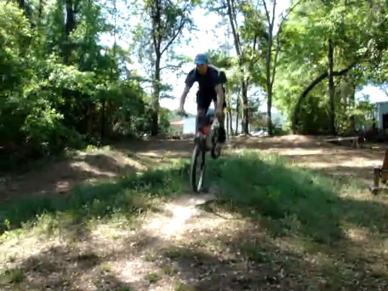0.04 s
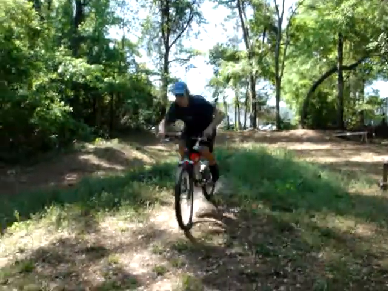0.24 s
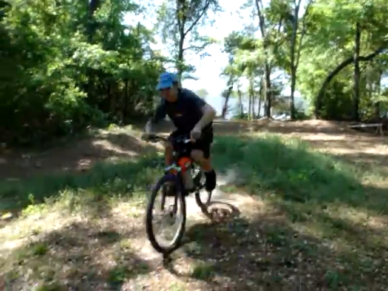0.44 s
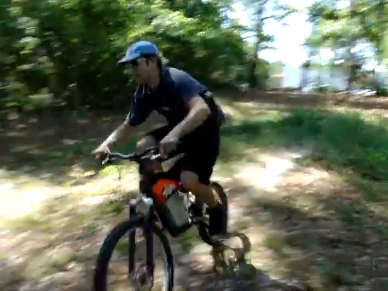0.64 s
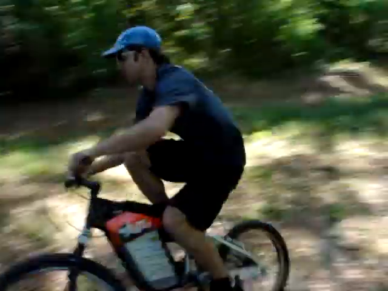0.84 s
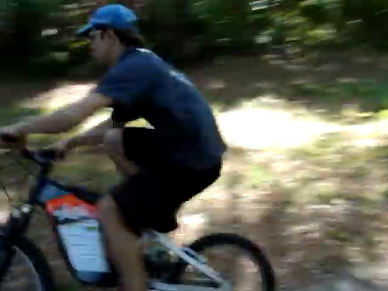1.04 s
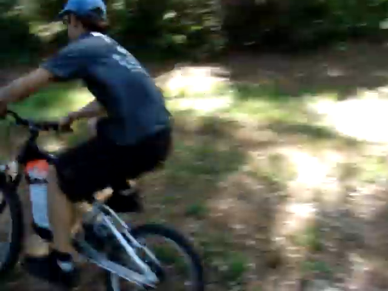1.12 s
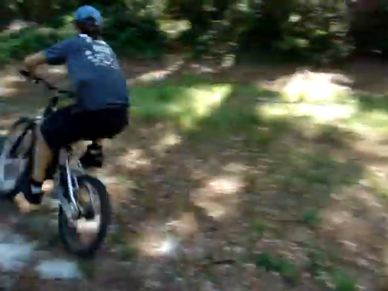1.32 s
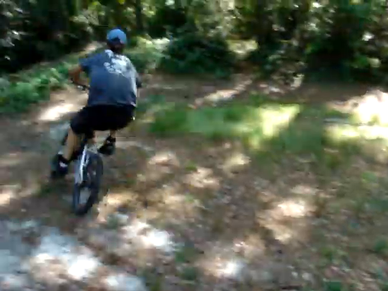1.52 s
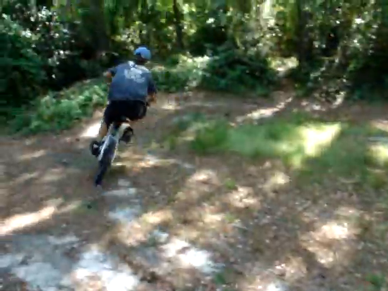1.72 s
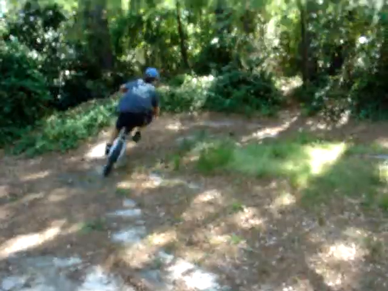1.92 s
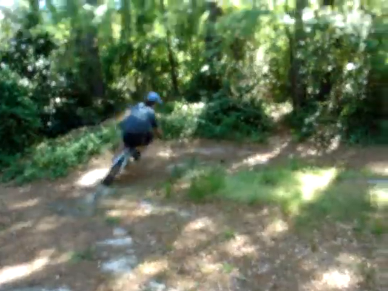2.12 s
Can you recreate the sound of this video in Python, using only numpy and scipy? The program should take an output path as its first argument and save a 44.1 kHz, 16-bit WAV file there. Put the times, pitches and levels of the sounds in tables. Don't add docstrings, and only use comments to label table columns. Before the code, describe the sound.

Bike crashes down with a distorted thud, clattering and crackling over dry leaves as it rides off.

```python
import sys
import numpy as np
from scipy import signal
from scipy.fft import rfft, irfft
from scipy.io import wavfile
from scipy.ndimage import uniform_filter1d, minimum_filter1d

SR = 44100
rng = np.random.default_rng(int(sys.argv[2]) if len(sys.argv) > 2 else 0)


def invert_db(x):
    u = np.asarray(x, float) / 20
    return 10 ** u


def generate_wav(sig):
    pcm = np.round(np.clip(np.atleast_2d(sig).T, -1, 1) * 32767).astype(np.int16)
    wavfile.write(sys.argv[1], SR, pcm)


N = 94815

# start_s, peak_db, pitch_hz, chatter_s
KNOCKS = [(0.233, -11.5, 327, 0.018), (0.281, -14.5, 475, 0.043), (0.407, -13.5, 534, 0.017),
          (0.418, -23, 332, 0.024), (0.464, -18, 347, 0.014), (0.455, -20, 480, 0.022),
          (0.496, -12.5, 477, 0.012), (0.636, -22, 485, 0.027), (0.686, -10, 546, 0.025),
          (0.719, -16.5, 594, 0.017), (0.785, -6, 456, 0.016), (0.816, -15, 472, 0.015),
          (0.869, -25, 560, 0.0087), (0.881, -11, 477, 0.013), (0.924, -15.5, 499, 0.015),
          (0.963, -20.5, 293, 0.022), (1.033, -17.5, 440, 0.0075), (1.085, -14, 400, 0.014),
          (1.121, -12.5, 477, 0.0066), (1.164, -14, 500, 0.0048), (1.175, -18, 329, 0.031),
          (1.202, -3.5, 405, 0.013), (1.247, -18.5, 506, 0.011), (1.265, -11, 523, 0.0066),
          (1.273, -10.5, 460, 0.0028), (1.308, -9.5, 518, 0.009), (1.34, -18, 488, 0.017),
          (1.434, -19.5, 541, 0.0093), (1.499, -25, 392, 0.014), (1.642, -25, 330, 0.011),
          (1.872, -20.5, 300, 0.023), (1.933, -28, 244, 0.0083), (2.119, -24, 308, 0.012)]
# pitch_hz, width_hz, level_db
CASE_MODES = [(1100, 158, -15), (793, 255, -9), (2510, 390, -22.5)]
# start_s, peak_db, length_s, treble_db
CRUNCHES = [(0.22, -7.5, 0.017, -15), (0.283, -9, 0.0039, -3), (0.6214, -12.5, 0.0075, 1.5),
            (0.6877, -9.5, 0.0062, -11), (0.698, -6, 0.0055, -30), (0.7926, -8.5, 0.0057, -33),
            (0.8145, -11.5, 0.026, -11), (0.858, -11, 0.013, -16), (0.89, -13, 0.01, -10),
            (1.003, -18.5, 0.0079, -9), (1.023, -16, 0.02, 0), (1.091, -12.5, 0.016, -4),
            (1.1213, -9.5, 0.0051, -7), (1.16, -10, 0.0028, -22), (1.168, -15, 0.01, -11),
            (1.201, -13, 0.015, -15), (1.245, -14, 0.0092, -8), (1.264, -10, 0.013, -14.5),
            (1.331, -14.5, 0.0088, -21), (1.441, -21, 0.0061, 6.5), (1.4997, -13.5, 0.0046, -12),
            (1.595, -19.5, 0.0033, -4), (1.6165, -29, 0.0039, 11), (1.639, -19.5, 0.004, -2),
            (1.7014, -17.5, 0.0028, -5), (1.734, -25, 0.004, 9.5), (1.758, -18.5, 0.0019, 0),
            (1.7765, -20.5, 0.0011, 7.5), (1.804, -21.5, 0.0019, 7), (1.8514, -15.5, 0.0092, 6.5),
            (1.873, -17.5, 0.0086, -2), (1.891, -25, 0.012, 7), (1.9746, -33.5, 0.0024, 14),
            (1.997, -32, 0.0024, 15), (2.108, -25.5, 0.0036, 1)]
# start_s, level_db, length_s
BLOWS = [
    (.296, -9, .012),
    (.3105, -9, .011),
    (.322, -9.5, .008),
]
# freq_hz, level_db (per Hz)
LANDING_SPECTRUM = [(18, -65), (30, -24), (349, 2.5), (1300, 2), (1470, -3.5), (2010, 4), (2270, 0),
                    (8640, -13), (10000, -14.5), (13000, -59), (22000, -120)]
# time_s, level_db, brightness_db
ROLL = [(0.211, -30.5, 1.5), (.27, -25, -0.5), (0.452, -29.5, 5), (0.601, -33.5, 5.5), (0.658, -29.5, -3.5),
        (0.769, -27, 2), (.93, -26, -0.5), (1.001, -27.5, 2.5), (1.168, -26, -1.5), (1.239, -25, 2.5),
        (1.37, -28, 2), (1.469, -30.5, -4.5), (1.582, -35.5, 0.5), (1.9, -37, -2.5), (2.03, -39, -6.5),
        (2.15, -34.5, 1)]
# freq_hz, level_db (per Hz)
TYRE_SPECTRUM = [(24, -57), (40, -16), (508, 4.5), (884, -2), (1580, -4.5), (2940, -4.5), (3790, -11),
                 (8510, -12.5), (10000, -17.5), (13000, -102), (22000, -120)]
# start_s, length_s, level_db, centre_hz
SKIDS = [
    (1.328, 0.028, -27, 2500),
    (1.368, 0.053, -30.5, 2720),
    (1.43, .03, -34.5, 2030),
    (.335, 0.039, -28, 5550),
    (1.505, 0.059, -35.5, 1800),
    (0.87, 0.02, -22, 2650),
]
# start_s, length_s, start_hz, end_hz, level_db
SQUEAKS = [
    (.03, 0.076, 8900, 8670, -51.5),
    (.16, 0.067, 9040, 8700, -40.5),
    (.308, 0.0076, 9500, 9300, -25),
    (.374, 0.028, 8800, 8700, -20.5),
    (.40, 0.018, 8590, 8960, -29),
    (.43, 0.016, 8650, 8630, -35.5),
]
# start_s, length_s, start_hz, end_hz, level_db
WHISTLES = [
    (.0, .06, 2850, 2970, -39.5),
    (.06, .085, 2950, 2900, -46),
    (.14, .027, 2430, 2560, -42),
    (.515, .075, 2980, 2950, -34),
    (2.07, .08, 2900, 3100, -44),
    (0, .04, 3550, 3450, -45),
]
# start_s (within the phrase), length_s, start_hz, end_hz, level_db
PHRASE = [
    (0, .032, 4080, 4270, -46),
    (.028, .03, 4200, 4200, -48),
    (.038, .012, 4350, 4600, -43),
    (.046, .02, 4700, 5080, -44),
    (.062, .056, 5060, 5050, -47),
    (.052, .06, 4550, 4650, -49),
    (.122, .032, 3520, 3520, -44),
]
# start_s, level_db
SONGS = [
    (.05, 3.5),
    (.588, 10),
    (.852, 7.5),
]
# freq_hz, level_db (per Hz)
TREE_SPECTRUM = [(18, -56), (30, -6), (445, 10), (2160, -3), (2890, 1.5), (3780, -12), (4590, -1.5),
                 (5720, -15), (10000, -9.5), (13000, -48), (22000, -120)]


def level(x, db):
    return x * invert_db(db) / np.sqrt(np.mean(x ** 2))


def band(x, hz, width_hz):
    return signal.lfilter(*signal.iirpeak(hz, hz / width_hz, fs=SR), x)


def walk(rate_hz):
    hold = int(SR / rate_hz)
    steps = rng.standard_normal(N)[np.arange(N) // hold]
    return 1.2 * uniform_filter1d(uniform_filter1d(steps, hold), hold)


def colour(x, spectrum):
    hz, db = np.array(spectrum).T
    bins_hz = np.arange(len(x) // 2 + 1) * SR / len(x) + 1
    return irfft(rfft(x) * invert_db(np.interp(np.log(bins_hz), np.log(hz), db)), len(x))


def grains(per_s, spread_db, count=N):
    smear_t60_s = .02
    when, size, noise = rng.random((3, count))
    clicks = (when < per_s / SR) * invert_db(np.minimum(-spread_db * np.log(1 - size), 9))
    power = signal.lfilter([1], [1, -invert_db(-120 / (smear_t60_s * SR))], clicks ** 2)
    return level(np.sqrt(power) * (noise - .5), 0)


def gate(start_s, length_s, attack_s, t60_s):
    t = np.arange(N) / SR - start_s
    return np.clip(t / attack_s, 0, 1) * invert_db(-60 * np.clip(t - length_s, 0, None) / t60_s)


def octaves(spectrum, source, swell_db, own_db, tilt_db):
    x = level(colour(source, spectrum), 0)
    swell = swell_db * walk(27.65)
    out = np.zeros(N)
    for hz in 40 * 2 ** np.arange(0, 8.3, .5):
        tilt = tilt_db * np.log2(hz / 1000) / 3
        out += band(x, hz, hz / 2.17) * invert_db(swell + own_db * walk(30) + tilt)
    return out


def glides(rows, rough):
    t, out = np.arange(N) / SR, np.zeros(N)
    waver, flutter = .013 * walk(260), rough * walk(500)
    for start, length, hz0, hz1, db in rows:
        u = np.clip((t - start) / length, 0, 1)
        hz = (hz0 + (hz1 - hz0) * u) * (1 + waver)
        swell = np.sqrt(np.sin(np.pi * u) + 1e-9) * (u < 1)
        out += invert_db(db) * (1 + flutter) * swell * np.sin(2 * np.pi * np.cumsum(hz) / SR)
    return out


def case():
    width_hz, ring_db, ring_sag_per_s = 107, -22, 4.2
    out, upper = np.zeros(N), np.zeros(N)
    contacts = grains(1300, 1.7) + 0.84 * rng.standard_normal(N)
    for start, db, hz, length in KNOCKS:
        t = np.clip(np.arange(N) / SR - start, 0, .1)
        ring = np.sin(2 * np.pi * hz * t * (1 - ring_sag_per_s * (t - length)))
        out += invert_db(db + ring_db) * gate(start, length, 0.0017, 0.023) * ring
        push = contacts * gate(start, length, 0.0015, 0.026) * invert_db(db)
        push[int(start * SR) + 40] += 9 * invert_db(db)
        modes = band(push, hz, width_hz) + .5 * band(push, 1.426 * hz, width_hz)
        out += band(modes, hz, 1.85 * width_hz)
        upper += push
    return invert_db(8.5) * (out + sum(invert_db(db) * band(upper, hz, w) for hz, w, db in CASE_MODES))


def crunches():
    snap = grains(2000, 1.1) + 0.59 * rng.standard_normal(N)
    mid = band(snap, 2560, 2400)
    treble = band(band(snap, 7950, 3100), 5800, 6500)
    out = np.zeros(N)
    for start, db, length, treble_db in CRUNCHES:
        env = gate(start, length, 0.00038, 0.015) + 1.5 * gate(start, 0, 0.00025, 0.0085)
        out += invert_db(db - 9.5) * env * (mid + invert_db(treble_db - 6.5) * treble)
    return out


def landing():
    crash = level(colour(grains(900, 14.0) + 0.59 * rng.standard_normal(N), LANDING_SPECTRUM), 0)
    blows = sum(invert_db(db) * gate(s, n, .0015, .03) for s, db, n in BLOWS)
    settle = invert_db(-22.5) * gate(0.2828, 0.089, 0.014, 0.82)
    thump = np.sin(2 * np.pi * 26 * np.arange(N) / SR) * gate(BLOWS[0][0], 0.073, 0.0038, .22)
    return crash * (blows + settle) + invert_db(-36) * thump


def tyres():
    time_s, db, bright_db = np.array(ROLL).T
    t = np.arange(N) / SR
    crackle = grains(1100, 3.4) + 0.57 * rng.standard_normal(N)
    x = octaves(TYRE_SPECTRUM, crackle, 0.62, 0.96, np.interp(t, time_s, bright_db))
    return level(x, 0) * invert_db(np.interp(t, time_s, db) - 0.5) * gate(0.201, 9, 0.012, 1)


def skids():
    grit, out = grains(2000, 4.0), np.zeros(N)
    for start, length, db, hz in SKIDS:
        scrape = band(band(grit, hz, hz / 2.1), hz, hz / 1.4)
        out += level(scrape, db) * gate(start, length, 0.0053, 0.049)
    return out


def spring():
    return glides(SQUEAKS, 0.87)


def birds():
    notes = list(WHISTLES)
    for at, more_db in SONGS:
        notes += [(s + at, n, hz0, hz1, db + more_db) for s, n, hz0, hz1, db in PHRASE]
    song = glides(notes, .8)
    echo_db, echo_t60_s = -2, .25
    tail = rng.standard_normal(8000) * invert_db(-60 * np.arange(8000) / SR / echo_t60_s)
    echo = signal.fftconvolve(song, tail / np.sqrt(np.sum(tail ** 2)))[:N]
    return song + invert_db(echo_db) * echo


def trees():
    return level(octaves(TREE_SPECTRUM, rng.standard_normal(N), 2.7, 0.55, 0), -41)


def scene():
    return (case() + crunches() + landing() + tyres() + skids() + spring() + birds() + trees())[None]


def camera(x):
    hop, coarse_hz, drop_db, scatter_db = 256, 4300, -7.5, 4.0
    n, k = np.arange(2 * hop), np.arange(hop)
    waves = np.cos(np.pi / hop * np.outer(k + .5, n + .5 + hop / 2))
    basis = np.sin(np.pi * (n + .5) / (2 * hop)) * waves * np.sqrt(2 / hop)
    pad = np.pad(x, (hop, 3 * hop - N % hop))
    at = np.arange(len(pad) // hop - 1)[:, None] * hop + n
    c = pad[at] @ basis.T
    bands = np.sqrt(np.mean(c.reshape(len(c), -1, 8) ** 2, axis=2)) + 1e-9
    loud = -minimum_filter1d(-np.median(bands[:, 6:15], axis=1), size=7, origin=-1)
    scatter = rng.standard_normal(len(c))[np.arange(len(c)) // 2] * .7
    pairs = np.arange(bands.shape[1]) // 2
    scatter = scatter + 1.1 * rng.standard_normal(bands.shape)[:, pairs].T
    step = np.repeat(loud * invert_db(drop_db + scatter_db * scatter), 8, axis=0).T
    kept = np.repeat(bands, 8, axis=1) > step
    rounded = np.round(c / step / 2) * step * 2 * kept + .02 * c
    c = np.where((k + .5) * SR / (2 * hop) > coarse_hz, rounded, c)
    out = np.zeros(len(pad))
    np.add.at(out, at, c @ basis)
    return out[hop:hop + N]


def roll_off(x):
    return signal.sosfilt(signal.butter(12, 15760, fs=SR, output="sos"), x)


def record(dry):
    x = camera(np.clip(dry[0], -.7, .7))[None]
    x = signal.sosfilt(signal.ellip(10, .2, 80, 10080, fs=SR, output="sos"), x)
    return roll_off(np.clip(x, -.757, .757))


dry = scene()
out = record(dry)
generate_wav(out)
```